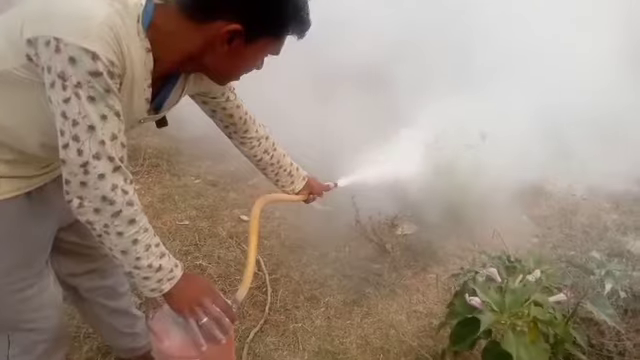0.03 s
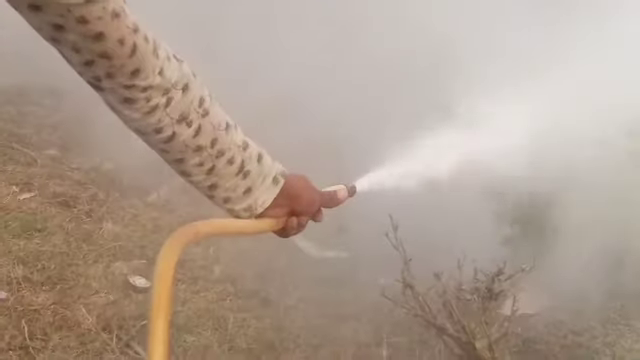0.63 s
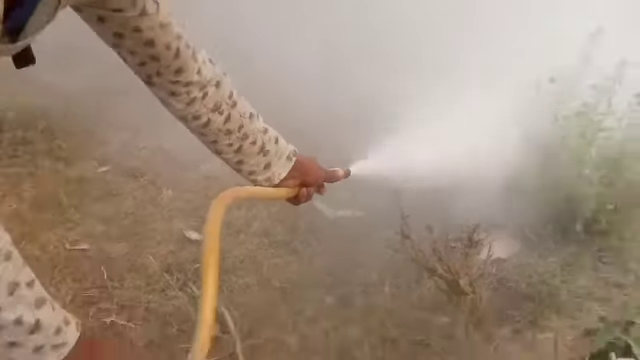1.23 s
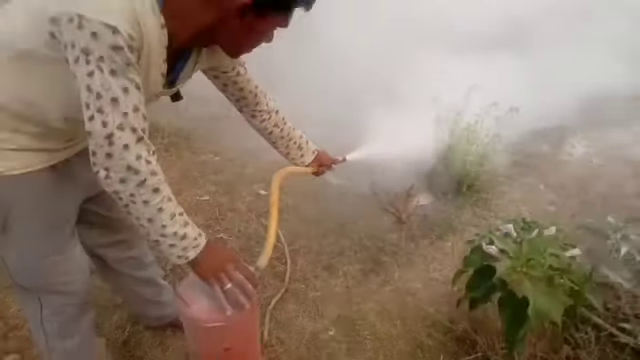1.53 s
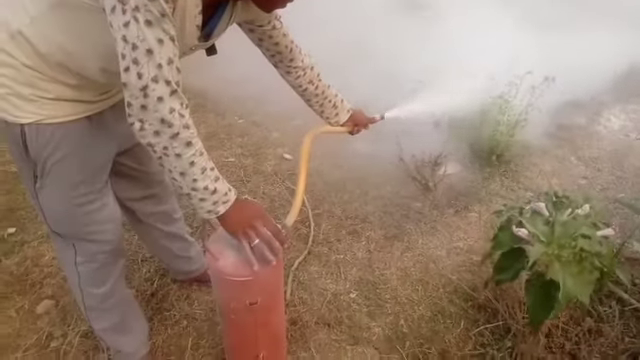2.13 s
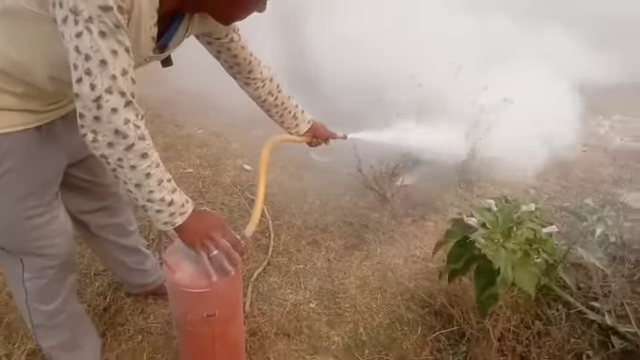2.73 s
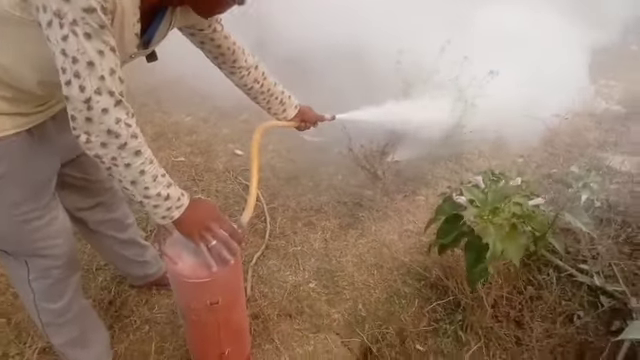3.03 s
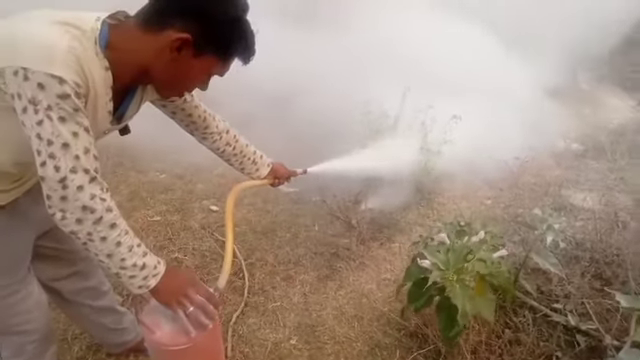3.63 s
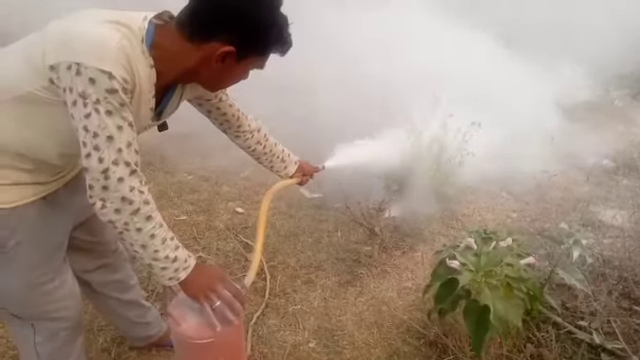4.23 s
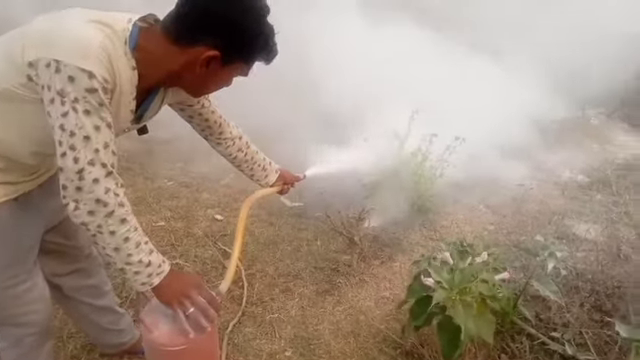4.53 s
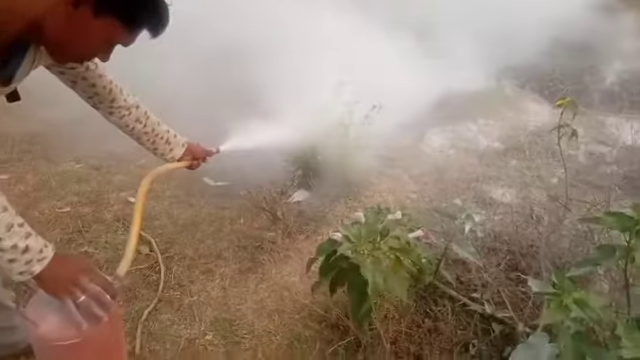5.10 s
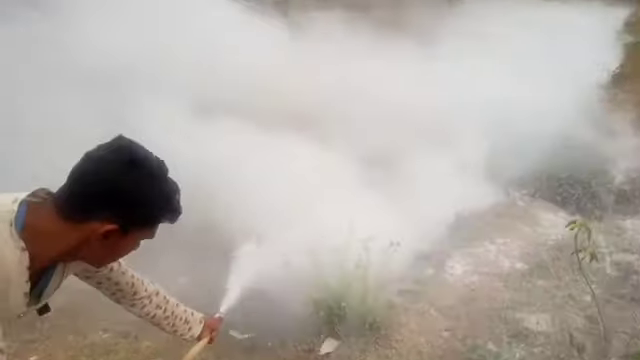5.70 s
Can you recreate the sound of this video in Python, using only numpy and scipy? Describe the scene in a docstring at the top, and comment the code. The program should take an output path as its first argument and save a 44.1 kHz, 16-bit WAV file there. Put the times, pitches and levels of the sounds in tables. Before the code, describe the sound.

Outdoors, a close hand-held microphone picks up the rushing hiss of a fire extinguisher spraying without a break for about six seconds. It is strongest and most uneven at the start, with tiny spits of powder, and gradually weakens through the second half while its colour slides a little. Low wind buffeting comes and goes beneath the spray, now and then bumping the microphone.

```python
"""Powder fire extinguisher over dry grass

Outdoors, close to the hose, on a moving hand-held microphone. The turbulent jet hisses, fluttering with
the uneven powder feed and spitting as clumps pass the nozzle. Short echoes off the ground and nearby
surfaces comb the hiss. Underneath, gusts of air rumble, flap and thump on the microphone port."""
import sys
import numpy as np
from scipy.fft import rfft, irfft, next_fast_len
from scipy.io import wavfile
from scipy.ndimage import uniform_filter1d, map_coordinates

SR = 44100
rng = np.random.default_rng(int(sys.argv[2]) if len(sys.argv) > 2 else 0)


def digitize_waveform(pressure):
    """Quantize a signal to 16-bit integers and store it at the path in sys.argv[1].

    Rows of a 2-D input are taken as channels; values are limited to [-1, 1].
    """
    field = np.atleast_2d(pressure).T
    bounded = np.clip(field, -1, 1)
    quanta = np.round(bounded * 32767).astype(np.int16)
    wavfile.write(sys.argv[1], SR, quanta)


N = 262836

# The jet as nozzle and microphone move. Each row: time in seconds, then roar, hiss, sizzle and air in dB.
JET_LEVELS = [(0.0, -40, -30.5, -40, -68), (0.34, -36.5, -25, -30, -53), (0.7, -40.5, -28.5, -31, -48),
              (1.34, -40.5, -29, -29, -48), (1.77, -39, -29, -32.0, -49), (2.01, -43.5, -27, -26, -37),
              (2.25, -42, -29.5, -33.5, -42), (2.41, -40, -31.5, -35, -49), (2.71, -41.5, -30, -37, -54),
              (3.09, -42.5, -33, -31.5, -46), (3.34, -42, -31.5, -32.0, -44), (3.89, -44.5, -35, -38, -51),
              (4.34, -45, -36.5, -37, -56), (4.7, -44.0, -32.0, -31.5, -46), (5.0, -46, -37.5, -38.5, -53),
              (5.27, -48, -40.5, -44, -52), (5.56, -47.0, -37.0, -35.5, -55),
              (5.62, -47.0, -45, -48.5, -56), (5.83, -47.5, -45.5, -46.5, -56),
              (5.96, -44, -40.5, -38.5, -52)]
# Colour of the raw jet. Each row: frequency in Hz, relative level in dB.
JET_SPECTRUM = [(250.0, -34), (740.0, -11.5), (970.0, -13), (1500.0, -12.5), (2200.0, -11.5), (2600.0, -8),
                (2950.0, 1.26), (3700.0, 3.5), (5300.0, 2.5), (7400.0, 5), (8400.0, -2), (10000.0, -19.5),
                (12000.0, -20.5), (14500.0, -9)]
# The four edges between roar, hiss, sizzle, fizz and air, in Hz.
BAND_EDGES_HZ = [2650, 5500, 9200, 13250]
# Uneven powder feed, settling as the cylinder empties. Each row: time in seconds, flutter depth in dB.
FEED_FLUTTER = [(0, 3), (.45, 2.5), (.9, 2), (2.6, 1.57), (5, 0.77), (5.96, 1.2)]
# The feed surges (+) or chokes (-). Each row: centre in seconds, length in seconds, feed change in dB.
FEED_SURGES = [(.034, 0.053, 6.5), (.119, 0.027, 3.4), (.447, 0.021, 1.5), (.485, 0.052, -1.5),
               (.688, 0.026, 3), (.78, 0.022, -3.5), (.808, 0.029, 2.3), (.85, .035, 0),
               (1.222, 0.036, 2.5), (1.504, 0.048, -2), (1.584, 0.029, -6), (1.686, 0.054, 1.5),
               (2.365, 0.13, -5), (2.488, 0.032, -4.5), (2.518, 0.031, 3.5), (2.6, .04, 1.5),
               (2.69, 0.035, 2.5), (2.851, 0.04, -1), (2.883, 0.033, 3)]
# How far roar, hiss, sizzle, fizz and air each follow the feed, in dB per dB.
FEED_SWAY = [1.02, 0.89, 1.6, 1.75, 1.5]
# Steady resonances in the hiss. Each row: centre in Hz, half width in Hz, gain in dB.
RESONANCES = [(1220.0, 90.0, 5.9), (1820.0, 60.0, 2.9), (2150.0, 90.0, 4.6), (2950.0, 130.0, 3.1),
              (3530.0, 120.0, 1.5), (4670.0, 140.0, 0.9), (5930.0, 80.0, 1.5), (6570.0, 160.0, 2.8),
              (7130.0, 160.0, 0.9), (7610.0, 40.0, 1.8)]
# Five moving bands of the jet. Each row: time in seconds, centre in Hz, gain in dB.
LOW_ROAR = [(0, 700, 4), (1.5, 680, 0.5), (4, 650, -6), (5.96, 646, -3)]  # fades as the pressure drops
THROATY_ROAR = [(2.2, 1900, 0), (2.36, 1950, -4), (2.5, 1700, 4), (2.8, 1950, 0), (3.25, 2250, 4),
                (3.8, 2200, 0)]  # dips, then swells and rises as the jet is aimed lower
NOZZLE_RESONANCE = [(0.0, 3480.0, 3.5), (1.5, 3620.0, 1.9), (2.3, 3740.0, 8.9), (2.5, 3640.0, 0.7),
                    (2.8, 3480.0, 0.0), (3.05, 3560.0, 8.5), (3.3, 3640.0, 10.0), (3.55, 3850.0, 5.9),
                    (4.15, 3920.0, 10.5), (4.55, 3980.0, 9.5), (4.85, 4130.0, 4.0), (5.3, 4140.0, 8.4),
                    (5.5, 4050.0, 4.2), (5.62, 3370.0, 5.9), (5.75, 3360.0, 11.0), (5.96, 3230.0, 9.0)]  # a breathy peak
LOW_HOLLOW = [(0.0, 2460.0, -6.9), (0.7, 2330.0, -6.5), (1.2, 2560.0, -12.7), (1.6, 2560.0, -17.4),
              (2.0, 2490.0, -2.5), (2.4, 2190.0, -4.1), (2.75, 2370.0, -6.0), (3.15, 2620.0, -1.5),
              (3.5, 2640.0, -5.0), (4.4, 2720.0, -10.6), (4.9, 2560.0, -8.0), (5.5, 2520.0, -9.1),
              (5.96, 2480.0, -2.5)]  # both hollows slide as the nozzle turns
HIGH_HOLLOW = [(0.0, 5290.0, -0.1), (1.6, 5100.0, -0.4), (2.1, 4810.0, -3.3), (2.5, 4490.0, -4.6),
               (2.85, 5060.0, -3.3), (3.2, 5760.0, -6.9), (3.8, 5380.0, -7.8), (4.2, 6210.0, -3.9),
               (4.7, 6030.0, -4.1), (5.0, 6550.0, -8.3), (5.35, 6880.0, -7.6), (5.6, 7000.0, 2.1),
               (5.96, 6990.0, -1.1)]
# Two echoes off nearby surfaces. Each row: time in seconds, long delay in ms, short delay in ms.
ECHO_DELAYS = [(0, 1.727, 1.576), (.7, 1.76, 1.55), (1.2, 1.667, 1.531), (1.65, 1.635, 1.525),
               (2.6, 1.672, 1.49), (3.2, 1.697, 1.37), (3.6, 1.7, 1.32), (4.05, 1.738, 1.348),
               (4.75, 1.707, 1.316), (5.05, 1.698, 1.45), (5.5, 1.7, 1.413), (5.96, 1.79, 1.405)]
# Strength of the long and the short echo, as shares of the direct sound.
ECHO_STRENGTHS = [0.19, 0.17]
# Clumps of powder leaving the nozzle. Each row: start in seconds, relative peak level in dB.
CLUMPS = [(.057, -8), (0.104, -9), (0.316, -7), (.446, -12.5), (0.4516, -2), (1.43, -6), (1.942, -13),
          (1.996, -10), (2.224, -12), (2.513, -14)]
# Air flowing over the microphone. Each row: time in seconds, strength in dB.
AIRFLOW = [(0.0, -37.5), (0.2, -42), (0.71, -41.5), (0.94, -34.0), (1.28, -44), (1.48, -38), (1.82, -29.5),
           (2.1, -30), (2.59, -39), (2.78, -37.5), (3.06, -39.5), (3.46, -34.5), (3.8, -39.5),
           (3.99, -36.5), (4.02, -44), (4.77, -43), (5.27, -35), (5.39, -39), (5.58, -31.5), (5.86, -40.0),
           (5.96, -39)]
# Gusts on top of that flow. Each row: centre in seconds, length in seconds, rise in dB.
GUSTS = [(0.049, 0.112, 4.7), (0.325, 0.12, 8.5), (0.719, 0.029, 8), (1.067, 0.14, 8), (1.182, 0.0307, 8),
         (1.292, 0.11, 8.5), (1.428, 0.033, 6.5), (1.549, 0.092, 4.8), (2.634, 0.033, 6.5),
         (2.726, 0.096, 6.5), (3.21, 0.091, 5.5), (3.524, 0.046, 1.5), (3.627, 0.029, 9),
         (3.856, 0.05, 4.5), (4.386, 0.04, 6.5), (4.508, 0.048, 4), (4.985, 0.079, 4)]
# The two colours of wind at the port. Each row: frequency in Hz, relative level in dB.
RUMBLE_SPECTRUM = [(20, -48), (35, -17), (50, -23), (70, -3), (100, 0), (160, -3), (220, -14.5), (320, -34),
                   (600, -73)]
FLAPPING_SPECTRUM = [(90, -19), (150, -0.5), (205, 1), (300, -4.5), (450, -14.5), (700, -24), (1200, -41.5),
                     (3000, -75)]
# Single eddies hitting the port. Each row: centre in seconds, peak level in dB, width in seconds.
EDDIES = [(0.722, -22, 0.00047), (3.533, -19.5, 0.0022), (3.623, -14, 0.00093), (3.67, -22, 0.0014),
          (5.511, -33, 0.0017), (5.632, -27, 0.0023)]


def jet(sputter, shimmer_db):
    """The jet close up: large eddies (roar) to fine ones (fizz, air), all shaken by the powder feed."""
    roar_db, hiss_db, sizzle_db, air_db = curves(JET_LEVELS)
    fizz_db = 0.66 * sizzle_db + 0.34 * air_db - 11  # follows the bands on either side
    levels_db = [roar_db, hiss_db, sizzle_db, fizz_db, air_db]
    depth_db, = curves(FEED_FLUTTER)
    # uneven feed shakes all eddy sizes together, at several speeds
    flutter_db = depth_db * (0.42 * wobble(75) + 0.74 * wobble(170) + 0.5 * wobble(700))
    flutter = steadied(amp(flutter_db), samples=2600)
    feed_db = swells(FEED_SURGES) + sputter * depth_db * wobble(32.05)
    bands = eddy_bands(ground_scatter(near_echoes(turbulence())), order=32)
    return flutter * sum(amp(db + sway * feed_db + shimmer_db * wobble(20)) * band
                         for db, sway, band in zip(levels_db, FEED_SWAY, bands))


def turbulence():
    """Rushing noise at the nozzle, coloured by steady resonances and by sliding peaks and hollows."""
    def peaks(hz):
        return amp(sum(db / (1 + ((hz - centre) / width) ** 2) for centre, width, db in RESONANCES))
    rush = filtered(noise(JET_SPECTRUM), peaks)
    rush = swept(rush, LOW_ROAR, half_width_hz=150)
    rush = swept(rush, THROATY_ROAR, half_width_hz=180)
    rush = swept(rush, NOZZLE_RESONANCE, half_width_hz=105)
    rush = swept(rush, LOW_HOLLOW, half_width_hz=130)
    return swept(rush, HIGH_HOLLOW, half_width_hz=200)


def eddy_bands(x, order):
    """Roar, hiss, sizzle, fizz and air: overlapping bands of x, each of rms 1."""
    highs = [filtered(x, lambda hz: 1 - 1 / (1 + (hz / edge) ** order)) for edge in BAND_EDGES_HZ]
    above = [x, *highs, 0]
    return [unit(lower - upper) for lower, upper in zip(above, above[1:])]


def spits(rise_s, gain_db, cutoff_hz):
    """Each clump bursts out as a few milliseconds of louder, coarser jet noise."""
    t = np.arange(N) / SR
    bursts = np.zeros(N)
    for start, db in CLUMPS:
        age = np.maximum(t - start, 0) / rise_s
        bursts += amp(db + gain_db) * age * np.exp(1 - age)
    coarse = filtered(noise(JET_SPECTRUM), lambda hz: 1 / (1 + (hz / cutoff_hz) ** 4))
    return bursts * unit(coarse)


def near_echoes(x):
    """Two echoes off nearby surfaces cut notches that slide as hose and microphone move."""
    out = x.copy()
    for delay_ms, strength in zip(curves(ECHO_DELAYS), ECHO_STRENGTHS):
        out += strength * delayed(x, delay_ms / 1000)
    return out


def ground_scatter(x, count=6, strength=0.085, drift_s=0.00003):
    """Rough ground returns weak echoes whose paths to the microphone drift slowly."""
    out = x.copy()
    for delay_s in rng.uniform(0.002, 0.005, count):
        out += strength * delayed(x, delay_s + drift_s * wobble(1.2))
    return out


def wind(lumpy_db, rumble_gain_db, rumble_wander_db, flap_wander_db):
    """Lumpy low turbulence right on the microphone port; stronger gusts flap higher up."""
    flow_db, = curves(AIRFLOW)
    strength_db = flow_db + swells(GUSTS)
    rumble_db = strength_db + rumble_gain_db + rumble_wander_db * wobble(20)
    # flapping grows about twice as fast in dB as the wind, from -39.8 dB at a strength of -36 dB
    flap_db = -39.8 + 1.96 * (strength_db + 36) + flap_wander_db * wobble(25)
    lumps = amp(lumpy_db * wobble(70))
    rumble = steadied(lumps * noise(RUMBLE_SPECTRUM), samples=2500)
    flapping = steadied(lumps * noise(FLAPPING_SPECTRUM), samples=2500)
    return amp(rumble_db) * rumble + amp(flap_db) * flapping


def thumps():
    """An eddy crossing the port is one push of pressure between two troughs."""
    t = np.arange(N) / SR
    out = np.zeros(N)
    for centre, db, width in EDDIES:
        offset = (t - centre) / width
        out += amp(db) * (1 - offset ** 2) * np.exp(-offset ** 2 / 2)
    return out


def swept(x, track, half_width_hz):
    """x with a moving band raised or lowered."""
    centre_hz, gain_db = curves(track)
    phase = 2 * np.pi * np.cumsum(centre_hz) / SR
    narrow = lambda hz: 1 / (1 + (hz / half_width_hz) ** 2)
    band = 2 * sum(carrier * filtered(x * carrier, narrow) for carrier in (np.cos(phase), np.sin(phase)))
    return x + (amp(gain_db) - 1) * band


def delayed(x, seconds):
    """x arriving late by a delay that may change every sample."""
    return map_coordinates(x, [np.arange(N) - seconds * SR])


def amp(db):
    """Decibels to gain."""
    return 10 ** (np.asarray(db) / 20)


def unit(x):
    """x scaled to rms 1."""
    return x / np.sqrt(np.mean(x ** 2) + 1e-20)


def curves(rows):
    """One value per sample for each column after the time."""
    times, *columns = np.transpose(rows)
    return [np.interp(np.arange(N) / SR, times, column) for column in columns]


def swells(rows):
    """Bell-shaped rises and dips in dB."""
    t = np.arange(N) / SR
    return sum(db * np.exp(-(2 * (t - centre) / length) ** 2) for centre, length, db in rows)


def wobble(rate):
    """A smooth random curve of rms 1, with rate knots a second."""
    knots = rng.standard_normal(int(N * rate / SR) + 4)
    return unit(map_coordinates(knots, [np.arange(N) * rate / SR]))


def filtered(x, response):
    """x through a filter whose gain is response(hz)."""
    size = next_fast_len(N + 8192)
    return irfft(rfft(x, size) * response(np.fft.rfftfreq(size, 1 / SR)), size)[:N]


def noise(spectrum):
    """Noise of rms 1, shaped by (Hz, dB) points joined on a log axis."""
    points_hz, db = np.transpose(spectrum)
    colour = lambda hz: amp(np.interp(np.log(hz + 1), np.log(points_hz), db))
    return unit(filtered(rng.standard_normal(N), colour))


def steadied(x, samples):
    """x with its rms held near 1 over stretches of that many samples."""
    power = uniform_filter1d(uniform_filter1d(x ** 2, samples), samples)
    return x / np.sqrt(np.abs(power) + 1e-12)


def scene():
    """Open air, one microphone: the spray close by and the wind on the port."""
    spray = jet(sputter=0.25, shimmer_db=0.55) + spits(rise_s=0.00074, gain_db=-13, cutoff_hz=5900)
    buffeting = wind(lumpy_db=3.0, rumble_gain_db=1.8, rumble_wander_db=2.0, flap_wander_db=1.2)
    return (spray + buffeting + thumps())[None]


def record(dry):
    """The hand-held recorder sheds the deepest bass and keeps nothing above its band limit."""
    low_cut_hz, top_hz = 32, 15520
    low_cut = lambda hz: 1 - 1 / (1 + (hz / low_cut_hz) ** 4)
    return filtered(dry[0], lambda hz: low_cut(hz) * (hz < top_hz))[None]


dry = scene()
out = record(dry)
digitize_waveform(out)
```